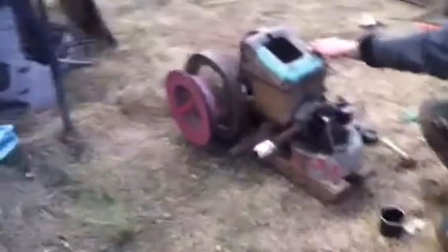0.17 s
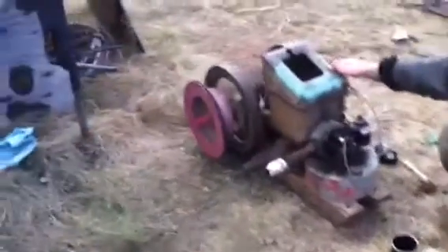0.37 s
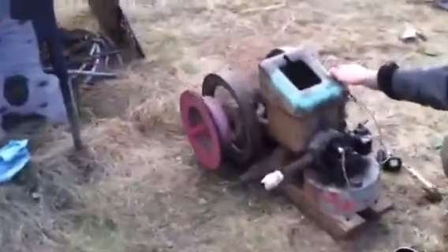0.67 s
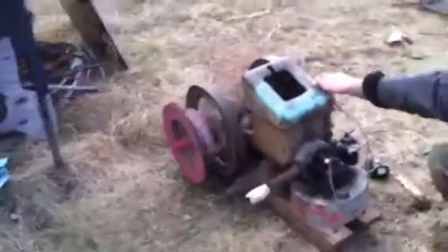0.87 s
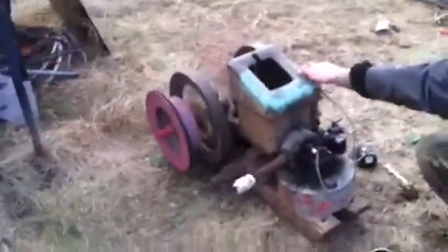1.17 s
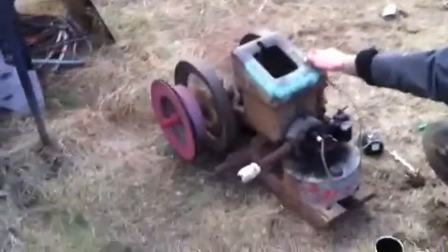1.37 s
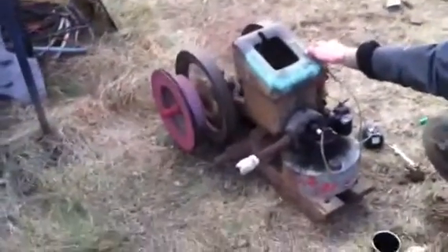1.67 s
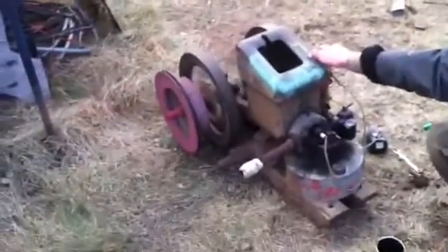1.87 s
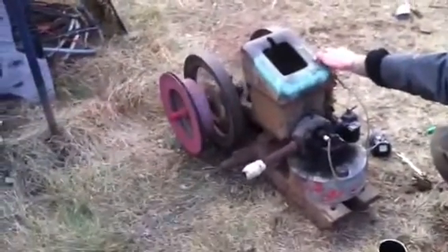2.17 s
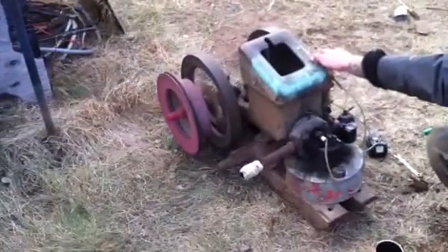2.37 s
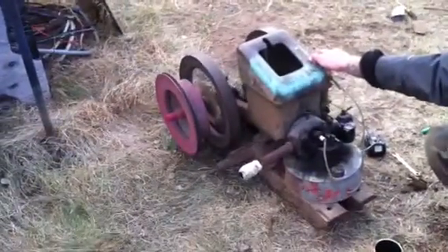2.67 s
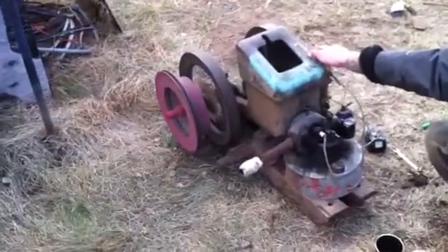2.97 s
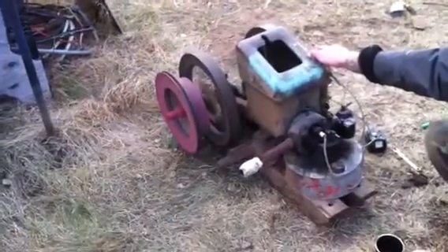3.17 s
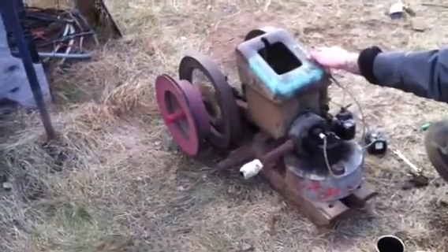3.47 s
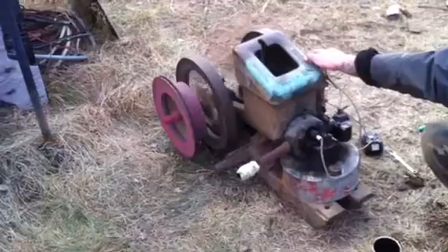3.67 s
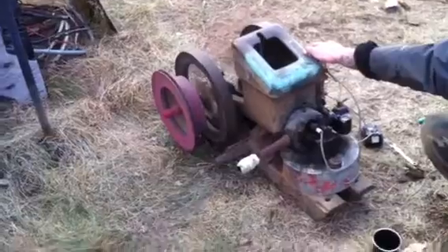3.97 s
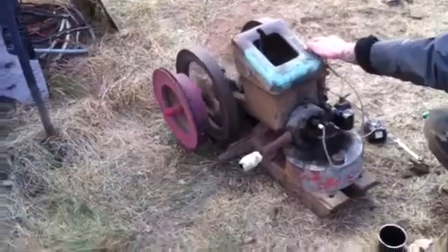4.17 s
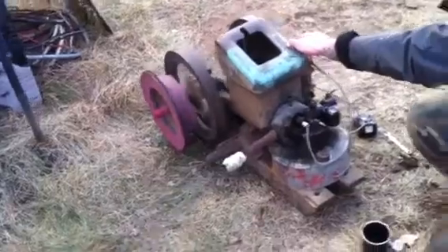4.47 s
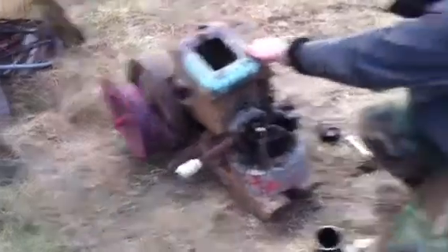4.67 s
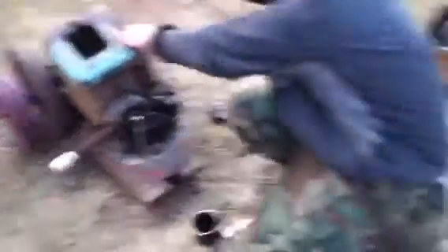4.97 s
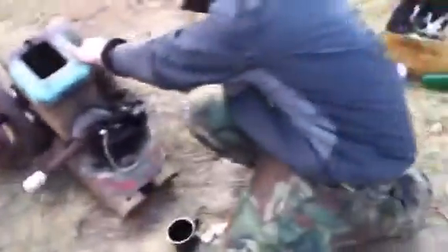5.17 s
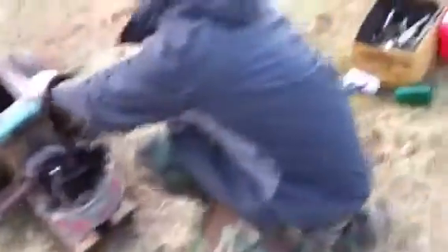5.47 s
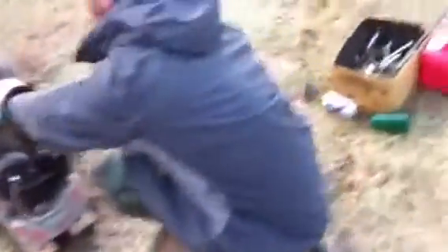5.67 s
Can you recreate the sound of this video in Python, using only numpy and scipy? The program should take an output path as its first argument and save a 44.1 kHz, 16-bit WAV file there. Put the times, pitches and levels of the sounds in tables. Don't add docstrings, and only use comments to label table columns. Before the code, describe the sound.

Outdoors and close up, a hit-and-miss engine runs steadily: sharp noisy pops about 0.4 to 0.6 seconds apart, and between them fast mechanical ticking, dull frame knocks, small rattles and pulsing breathy hiss. The hiss gradually grows as the listener moves round, while the ringing of the valve fades. Dry open air, small microphone that overloads slightly and ducks after pops.

```python
import sys
import numpy as np
from scipy import signal
from scipy.fft import rfft, irfft
from scipy.io import wavfile
from scipy.ndimage import uniform_filter1d

SR = 44100
rng = np.random.default_rng(int(sys.argv[2]) if len(sys.argv) > 2 else 0)


def to_wav(sig):
    pcm = np.clip(np.atleast_2d(sig), -1, 1) * 32767
    pcm = np.round(pcm).astype(np.int16)
    wavfile.write(sys.argv[1], SR, pcm.T)


def undo_db(level):
    steps = np.asarray(level, float) / 20
    return 10 ** steps


N = 255780
T = np.arange(N) / SR


def evened(x):
    return x / np.sqrt(np.mean(x ** 2) + 1e-20)


def read(points, at):
    return np.interp(at, *np.transpose(points))


def highpass(order, hz, x):
    return signal.sosfilt(signal.butter(order, hz, "high", fs=SR, output="sos"), x)


def noise(tone, size=N):
    hz, db = np.transpose(tone)
    f = np.fft.rfftfreq(size, 1 / SR)
    gain = undo_db(np.interp(np.log(f + 1), np.log(hz), db, -70, -70))
    return evened(irfft(rfft(rng.standard_normal(size)) * gain, size))


def band(hz, width):
    f = hz * np.geomspace(.25, 4, num=60)
    return np.c_[f, -20 * np.log10(1 + (2 * (f - hz) / width) ** 2)]


def gusty(ms, db):
    width = int(ms * 44)
    flicker = uniform_filter1d(uniform_filter1d(rng.standard_normal(N), width), width)
    return undo_db(db * evened(flicker))


def patchy(x, patch_db, frames=3, bins=4):
    z = signal.stft(x, nperseg=256)[2]
    field = uniform_filter1d(rng.standard_normal(z.shape[::-1]), frames, axis=0)
    field = uniform_filter1d(field, bins, axis=1)
    return signal.istft(z * undo_db(patch_db * evened(field).T), nperseg=256)[1][:len(x)]


def add(mix, s, sound):
    part = mix[round(s * SR):][:len(sound)]
    part += sound[:len(part)]


def ring(modes, rise_ms):
    t = T[:2600]
    turn = 2 * np.pi * t * rng.uniform(.994, 1.006)
    out = sum(undo_db(db - 60 * t / t60) * np.sin(hz * turn) for hz, db, t60 in modes)
    out = out * (1 - np.exp(-1000 * t / rise_ms))
    return out / abs(out).max()


def puff(tone, rise_ms, fall_ms):
    ms = 1000 * T[:2600]
    shape = (1 - np.exp(-ms / rise_ms)) ** 2 * np.exp(-ms / fall_ms)
    return noise(tone, size=2600) * shape / shape.max()


# (valve seating [s], shake of the engine [dB], stem ring [dB], pitch of the skid's knock [Hz])
ENGINE_CYCLES = [(0.038, 1.5, -19.5, 167), (0.2389, 4.5, -18.5, 207), (0.439, -2, -26, 159),
                 (.638, 1.5, -19, 248), (.842, 2.5, -18, 165), (1.047, -4.5, -31, 153),
                 (1.2505, 0, -31, 200), (1.455, -1, -25, 193), (1.654, 1, -16.5, 161),
                 (1.8574, 2.5, -17, 240), (2.059, -1.5, -19, 167), (2.2578, 0.5, -15, 290),
                 (2.4598, 3, -16.5, 154), (2.6627, 3.5, -15.5, 188), (2.8688, 4, -14, 210),
                 (3.076, 4, -19, 298), (3.284, 5.5, -22, 187), (3.489, 2, -23, 287), (3.688, 2.5, -19, 240),
                 (3.868, 4, -19, 202), (4.0684, -1.5, -29, 166), (4.268, 3.5, -29, 165),
                 (4.4697, 2.5, -42, 247), (4.672, 0.5, -28, 164), (4.87, 2.5, -40, 155),
                 (5.07, 1.5, -39, 156), (5.2716, 2.5, -41, 153), (5.471, 3, -48, 153),
                 (5.6668, 2.5, -49, 148), (5.868, 5.5, -45, 150)]
# (time [s], blast peak [dB], pipe thump [dB], 1 kHz colour [dB], second surge [dB])
FIRED_POPS = [(0.3258, 0, -25.5, 8.5, -13.5), (0.9291, -1, -30.5, 0.5, -18.5),
              (1.342, -2, -29.5, -0.5, -14.5), (1.945, -0.5, -24.5, 3, -12),
              (2.5482, -1, -34.5, -1.5, -13.5), (2.9595, -1, -34, 5, -13.5), (3.3754, -1, -27, -4.5, -16.5),
              (3.9568, -1, -26, 2, -10.5), (4.558, -1.5, -27, 1, -7.5), (4.9576, -2, -38, 4.5, -13),
              (5.3603, -1.5, -29.5, 2.5, -13)]


def governor():
    gap = np.transpose(ENGINE_CYCLES)[0][:, None] - np.transpose(FIRED_POPS)[0]
    fired = (gap > 0) & (gap < .15)
    charged = (gap < 0) & (gap > -.15)
    return fired.any(1), charged.any(1)


# (frequency [Hz], level [dB])
GAS_SPECTRUM = [(470, -69), (800, -13.5), (1660, -10.5), (2180, -4), (2840, -2), (4800, 1), (7450, -5.5),
                (11300, -4), (15000, -9.5), (16000, -16)]
# (frequency [Hz], level [dB])
RUMBLE_SPECTRUM = [(18, -24), (40, -26.5), (92, -21), (167, -3), (300, -4.5), (481, -12.5), (874, -8.5),
                   (1390, -11.5), (1530, -16), (1930, -9.5), (3000, -17), (3900, -27), (6600, -78)]
# (frequency [Hz], width [Hz], level [dB])
THROAT_MODES = [(3890, 160, -2), (4460, 300, 2), (5360, 350, -4.5), (5810, 240, -4)]
# (time [ms], level [dB])
GAS_CYCLE = [
    (-125, -59),
    (-112, -58.5),
    (-73.5, -38),
    (-52.5, -52.5),
    (-48, -48),
    (-1.5, -50.5),
    (-1, -58.5),
    (64.5, -58),
    (94, -81),
]
# (time [ms], level [dB])
INTAKE_CYCLE = [(-112, -77), (-69, -70), (-42.5, -73), (-51, -35.5), (-0.5, -41), (31, -54.5),
                (62.5, -54.5), (94, -69.5)]
# (time [ms], level [dB])
RUMBLE_CYCLE = [(-125, -52), (-112, -42), (-93, -47), (-73.5, -41), (-49, -45), (1, -49), (-1, -42),
                (25.5, -50), (63, -47.5)]


def breathing():
    s, shake = np.transpose(ENGINE_CYCLES)[:2]
    fired, charged = governor()
    nearing_db = 0.7 * s
    push_db = 0.42 * shake + 0.5 * fired + nearing_db
    coast_db = 5.5 + 4 * fired + 3 * charged
    turn = np.searchsorted(s + .08, T)
    ms = 1000 * (T - s[turn])
    effort_s = np.ravel([s - .075, s + 0.075], "F")
    effort_db = np.interp(T, effort_s, np.ravel([push_db, coast_db], "F"))

    def smooth(db):
        return undo_db(uniform_filter1d(db, size=130))

    gas = noise(GAS_SPECTRUM) * smooth(read(GAS_CYCLE, ms) + effort_db) * gusty(3.1, 0.53)
    f = np.geomspace(2500, 9000, num=200)
    throat = sum(undo_db(db) / (1 + (2 * (f - hz) / width) ** 2) for hz, width, db in THROAT_MODES)
    suck_db = read(INTAKE_CYCLE, ms) - 6 + 0.92 * shake[turn]
    whistle = noise(np.c_[f, 20 * np.log10(throat)]) * smooth(suck_db)
    shudder_db = read(RUMBLE_CYCLE, ms) + np.interp(T, s, shake)
    rumble = noise(RUMBLE_SPECTRUM) * smooth(shudder_db) * gusty(16.7, 2.37)
    return gas + whistle + rumble


# (time [s], peak [dB], pitch [Hz])
LINKAGE_KNOCKS = [(0.154, -31, 1290), (0.197, -32, 1040), (0.226, -33.5, 1340), (0.295, -28, 950),
                  (0.559, -33, 2080), (0.599, -45, 964), (0.756, -30, 1290), (0.799, -50, 1790),
                  (0.899, -35, 670), (1.581, -34.5, 1990), (1.783, -39, 890), (2.346, -26.5, 2020),
                  (2.384, -36, 899), (2.787, -27.5, 1280), (3.203, -28.5, 851), (3.336, -31, 2400),
                  (3.793, -36, 1940), (4.192, -31, 2130), (4.355, -32, 1960), (4.395, -27, 990),
                  (4.53, -23.5, 1250), (4.802, -31, 2200), (5.162, -31.5, 1770), (5.193, -26.5, 3000),
                  (5.326, -30, 1870), (5.591, -31, 2790), (5.789, -32, 2090)]


def linkage():
    out = np.zeros(N)
    for s, peak_db, hz in LINKAGE_KNOCKS:
        add(out, s - .0015, undo_db(peak_db - 6.0) * puff(band(hz, 600), 1.8, 4.5))
    for s, size, pitch in rng.random((500, 3)):
        rattle = ring([(500 * 6.0 ** pitch, 0, .012)], 0.4)
        add(out, s * N / SR, undo_db(-53 + 11.6 * size) * rattle)
    return out


# (time [s], chuff peak [dB], brightness [dB per octave])
UNFIRED_CHUFFS = [(0.1248, -26.5, -2.5), (0.521, -39, -2), (0.7265, -32.5, -2), (1.1332, -37, -8),
                  (1.5385, -38, -18), (1.7443, -33.5, -8), (2.1421, -36, -8), (2.3456, -36, -8),
                  (2.753, -25.5, -4), (3.1689, -30, -10), (3.5714, -31, -2), (3.754, -29.5, -9.5),
                  (4.1538, -33.5, -6), (4.357, -33.5, -8), (4.757, -33, -4), (5.1614, -34, -9),
                  (5.549, -33.5, -4.5), (5.752, -33, -9)]


def frame():
    out = np.zeros(N)
    knocks = [(s - .004, -18.5 + 0.64 * chuff_db, 300.5) for s, chuff_db, _ in UNFIRED_CHUFFS]
    for (s, shake, _, hz), fired in zip(ENGINE_CYCLES, governor()[0]):
        shake_db = 0.87 * shake
        stroke_hz = 304.5 if fired else 211
        knocks.append((s - .003, -39 + shake_db, hz))
        knocks.append((s - .055, -40 + 1 * fired + shake_db, stroke_hz))
    for s, peak_db, hz in knocks:
        modes = [(hz, 0, 0.056 * (hz / 250) ** 1.0), (1.51 * hz, -7, .02)]
        level = (s > 0) * undo_db(peak_db + 1.5)
        add(out, max(s - .002, 0), level * ring(modes, 1.86))
    return highpass(2, 115, out)


# (frequency [Hz], level [dB], t60 [s])
STEM_MODE = [(7424, 0, 0.02)]
# (frequency [Hz], level [dB], t60 [s])
SEAT_MODE = [(14850, 0, .025)]
# (frequency [Hz], level [dB])
TICK_SPECTRUM = [(2000, -16.5), (5000, -6), (7000, -2), (10000, -4.5), (13000, -2.5), (14900, 2),
                 (15900, -6)]
# (frequency [Hz], level [dB])
SPRING_SPECTRUM = [(6000, -27), (10000, -12), (13500, -8), (14900, -3), (15800, -5)]
# (time [s], ring [dB], tick [dB])
ROCKER_STRIKES = [(0.5357, -36, -46), (0.7404, -52, -52), (1.1457, -36.5, -49), (1.5508, -39, -44),
                  (1.7548, -30.5, -43), (2.155, -35, -43.5), (2.3574, -53, -65), (3.1787, -38, -43),
                  (3.586, -34, -44), (3.7656, -37, -43), (4.167, -31, -47), (4.768, -33, -44),
                  (5.168, -51, -40.5), (5.5645, -55, -38.5), (5.7633, -54, -36.5)]


def valve():
    out = np.zeros(N)
    bounce_s = 0.012
    for (s, shake, ring_db, _), fired in zip(ENGINE_CYCLES, governor()[0]):
        tick_db = -48 + 1.06 * shake + 1.55 * s
        bounce_ring_db = -25.5 + 0.57 * ring_db
        bounce_db = -38.5 + 1.2 * shake - 0.5 * fired
        clack = undo_db(ring_db - 13.5) * ring(STEM_MODE, 0.6)
        add(out, s, clack + undo_db(tick_db + 6.5) * puff(TICK_SPECTRUM, 0.29, 4.0))
        bounce = undo_db(bounce_ring_db) * ring(STEM_MODE, 0.49)
        add(out, s + bounce_s, bounce + undo_db(bounce_db) * puff(TICK_SPECTRUM, 1.2, 4.8))
        screened_db = -0.5 - 2 * s
        contacts = ((0, tick_db + 2.5), (bounce_s, bounce_db), (.025, bounce_db - 5), (.038, bounce_db - 7))
        for delay, db in contacts:
            add(out, s + delay, undo_db(db + screened_db) * ring(SEAT_MODE, 0.78))
        add(out, s + 0.037, undo_db(bounce_db - 13.0) * puff(SPRING_SPECTRUM, .8, 1.9))
        add(out, s + 0.046, undo_db(bounce_db - 16.0) * puff(SPRING_SPECTRUM, 0.99, 4.7))
    for s, ring_db, tick_db in ROCKER_STRIKES:
        strike = undo_db(ring_db) * ring(STEM_MODE, 0.23)
        add(out, s, strike + undo_db(tick_db + 7.5) * puff(TICK_SPECTRUM, 0.79, 3.2))
    return out


def chuffs():
    out = np.zeros(N)
    hz, db = np.transpose(GAS_SPECTRUM)
    for s, peak_db, bright_db in UNFIRED_CHUFFS:
        tone = np.c_[hz, db + bright_db * np.log2(hz / 3000)]
        add(out, s - .002, undo_db(peak_db - 7.0) * puff(tone, 5.9, 5.5))
    return out


# (late thump [dB], pipe-mouth howl [Hz], howl level [dB])
POP_HOWLS = [(-40, 3700, -17), (-12, 1400, -37), (-28, 2550, -26), (-25, 2430, -26), (-22, 1990, -17.5),
             (-38, 3800, -18.5), (-29, 2160, -20.5), (-25, 12000, -37), (-25, 2230, -16),
             (-24.5, 2160, -17.5), (-38, 2010, -33)]
# (time [ms], level [dB])
BLAST_ENVELOPE = [
    (-5.5, -49),
    (-1.5, -19.5),
    (1.5, -6.5),
    (4.5, -4.5),
    (9.5, -6.5),
    (16, -14),
    (25, -30),
    (86, -49.5),
    (139, -53.5),
]
# (time [ms], level [dB])
SURGE_ENVELOPE = [
    (20, -55),
    (26, -7),
    (30, -5),
    (36, -9),
    (45, -26),
    (70, -33),
]
# (frequency [Hz], level [dB])
BLAST_SPECTRUM = [(180, -14), (300, -2), (555, -11), (1560, -6.5), (2030, -4.5), (2980, -2), (3700, -1),
                  (5430, -0.5), (11700, 2), (13800, 0.5), (16000, -6.5)]
# (frequency [Hz], level [dB])
SURGE_SPECTRUM = [(300, -29), (900, -3), (2500, -0.5), (5000, 3), (11000, -3.5), (16000, -5)]
# (frequency [Hz], level [dB], t60 [s])
PIPE_MODES = [(191.4, -3.5, 0.032), (287, 3, 0.014), (686, -3.5, 0.012)]


def pops():
    jets, thumps = np.zeros(N), np.zeros(N)
    size = 6500
    ms = 1000 * T[:size] - 5
    hz, db = np.transpose(BLAST_SPECTRUM)
    for (s, peak_db, thump_db, low_db, surge_db), (late_db, howl_hz, howl_db) in zip(FIRED_POPS, POP_HOWLS):
        colours = [low_db, 0, -4.5 + 0.55 * low_db]
        tone = np.c_[hz, db + np.interp(np.log(hz), np.log([1000, 4000, 12000]), colours)]
        blast = undo_db(peak_db - 6.0) * noise(tone, size)
        blast = blast + undo_db(howl_db) * noise(band(howl_hz, 350), size)
        surge = undo_db(peak_db + surge_db - 8.0) * noise(SURGE_SPECTRUM, size)
        surge = surge + undo_db(surge_db - 14.5) * noise(band(2580, 450), size)
        surge = undo_db(read(SURGE_ENVELOPE, ms)) * (ms < 70) * surge
        add(jets, s - .005, undo_db(read(BLAST_ENVELOPE, ms)) * blast + surge)
        add(thumps, s - .0015, undo_db(thump_db + 13.0) * ring(PIPE_MODES + [(853, 2.3, 0.023)], 0.49))
        add(thumps, s + 0.00886, undo_db(late_db) * ring(PIPE_MODES, 0.7))
    jets = patchy(jets, 2.84) * gusty(1.0, 1.4)
    jets = jets + 0.38 * highpass(4, 900, jets ** 2)
    return jets + highpass(1, 110, thumps)


def scene():
    fired_s = np.transpose(FIRED_POPS)[0]
    since = T - np.r_[-1, fired_s][np.searchsorted(fired_s, T)]
    duck = undo_db(uniform_filter1d(-6.0 * np.exp(-since / 0.37), size=400))
    steady = patchy(breathing(), 2.48) + linkage()
    return (pops() + chuffs() + valve() + frame() + steady * duck)[None]


# (frequency [Hz], depth [dB])
MASKING_DEPTH = [(500, 57), (1500, 11), (4000, 25.5), (8000, 15), (15000, 15)]
# (frequency [Hz], level [dB])
AUDIBLE_FLOOR = [(4000, -100), (7000, -94), (15000, -72)]


def masked(x):
    lead = 1024 - 700
    padded = np.r_[np.zeros(lead), x, np.zeros(-(N + lead) % 1024)]
    hz, _, z = signal.stft(padded, SR, nperseg=256, noverlap=192)
    level = uniform_filter1d(abs(z[:, 1:]) ** 2, size=5, axis=0)
    level = uniform_filter1d(level, size=2, axis=1)
    level = 10 * np.log10(level + 1e-20).reshape(len(hz), -1, 16)
    seen = level - 99 * (np.arange(16) > 11)
    coming = np.maximum.accumulate(seen[..., ::-1], axis=2)[..., ::-1]
    wander = 6.5 * rng.standard_normal((level.shape[1], 33, 4))
    wander = np.repeat(np.repeat(wander, 4, axis=1), 4, axis=2).transpose(1, 0, 2)[:len(hz)]
    unmasked = level > coming - read(MASKING_DEPTH, hz)[:, None, None]
    audible = level > read(AUDIBLE_FLOOR, hz)[:, None, None] + wander
    keep = np.c_[np.ones(len(hz)), (unmasked & audible).reshape(len(hz), -1)]
    return signal.istft(z * keep, SR, nperseg=256, noverlap=192)[1][lead:lead + N]


def top_cut(x):
    return signal.sosfilt(signal.butter(12, 16790, fs=SR, output="sos"), x)


def record(dry):
    x = highpass(1, 40, dry[0])
    x = .85 * np.tanh(x / .85)
    x = signal.oaconvolve(masked(x), signal.firwin(255, 15800, fs=SR), "same")
    return top_cut(x[None])


dry = scene()
out = record(dry)
to_wav(out)
```